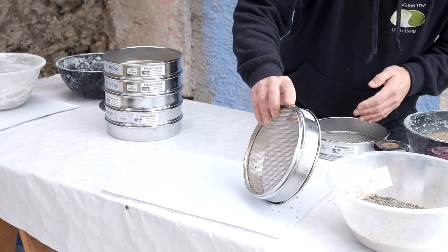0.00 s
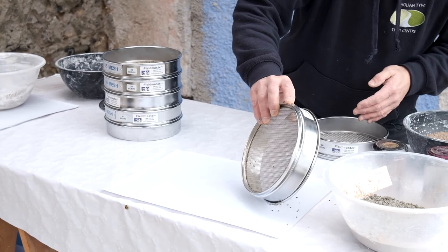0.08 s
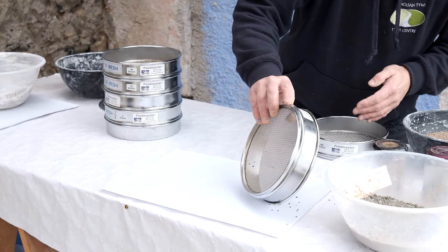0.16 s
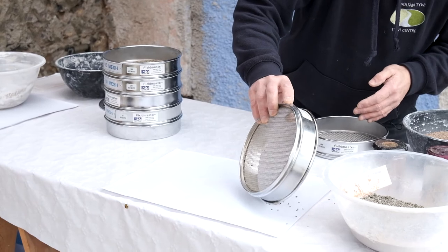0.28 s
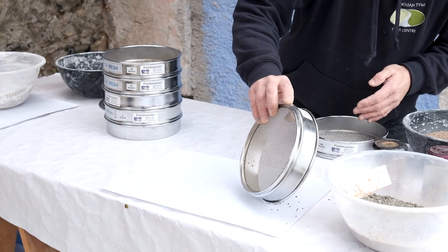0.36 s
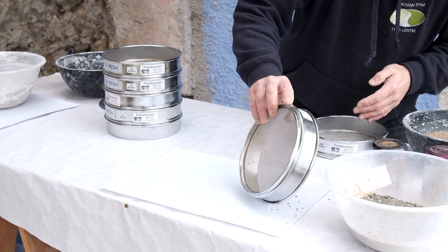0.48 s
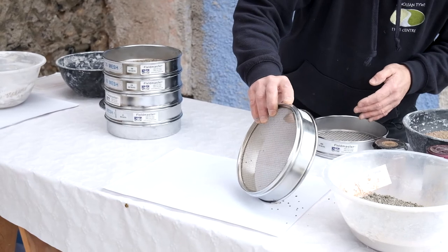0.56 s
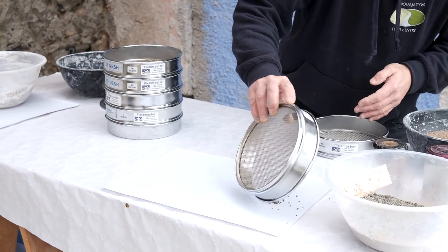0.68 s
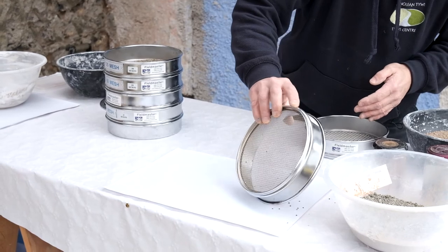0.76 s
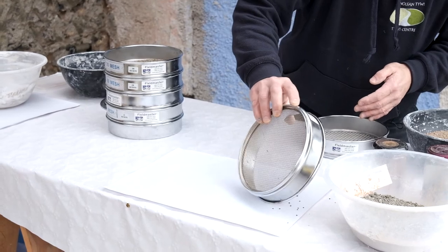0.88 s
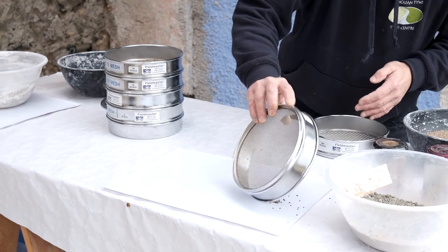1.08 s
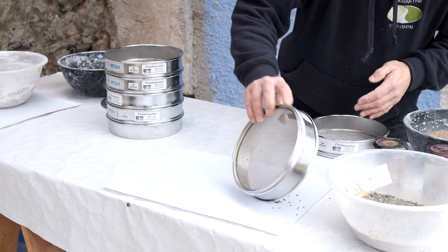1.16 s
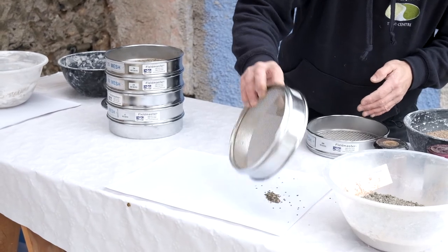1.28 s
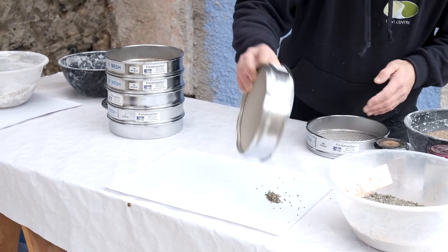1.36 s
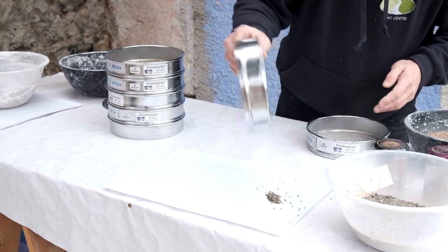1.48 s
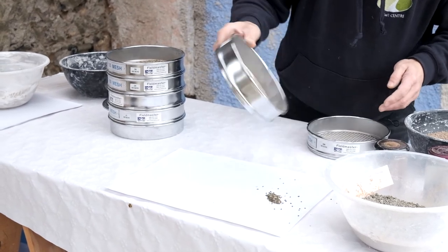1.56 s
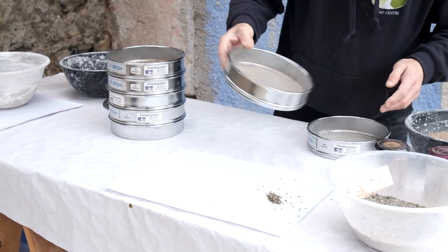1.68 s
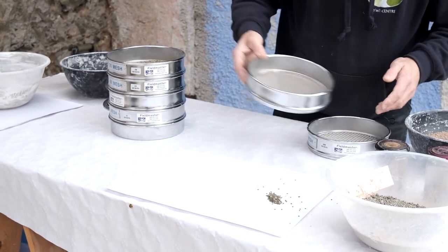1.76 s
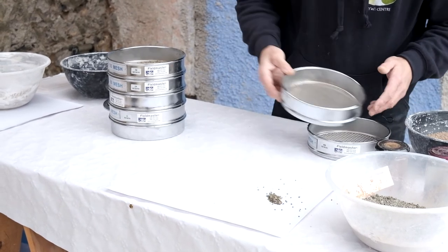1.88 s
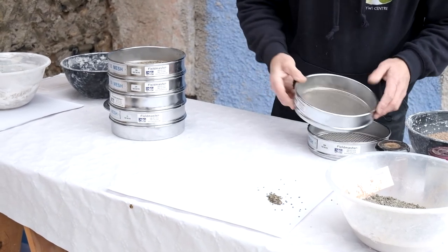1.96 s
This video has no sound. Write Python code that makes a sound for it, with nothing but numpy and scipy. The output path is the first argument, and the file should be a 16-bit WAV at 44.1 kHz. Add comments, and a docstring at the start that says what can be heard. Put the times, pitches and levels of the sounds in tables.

```python
"""Sieve knocked out on a table

A metal sieve is knocked on its rim against a cloth-covered table to shake out the last grit. The table top
thuds as a sum of damped modes over a dense shudder of noise; mesh and sand rattle as random impacts after
each knock, grains tick as band-limited bursts. Short blurred tones ring within the first knock, faintly later
and in a late scrape. Nearby walls answer by discrete echoes and a diffuse tail, over shaped noise for outdoor
rumble and gliding tones for faint birds."""
import sys
import numpy as np
from scipy import signal
from scipy.fft import rfft, irfft
from scipy.io import wavfile
from scipy.ndimage import uniform_filter1d

SR = 44100
rng = np.random.default_rng(int(sys.argv[2]) if len(sys.argv) > 2 else 0)


def attenuation_scalar(level_db):
    """Turn a level in dB into a linear amplitude multiplier (20 dB per decade)."""
    decades = np.asarray(level_db, float) / 20
    return 10 ** decades


def output_pcm(signal):
    """Save a mono or channel-first signal as 16-bit PCM at the path in sys.argv[1].

    Samples are clipped to [-1, 1] before scaling.
    """
    pcm = np.clip(np.atleast_2d(signal).T, -1, 1) * 32767
    wavfile.write(sys.argv[1], SR, np.round(pcm).astype(np.int16))


N = 88200  # samples, 2 s

# Blows of the rim on the table: (time [s], peak of the modal ring [dB], tuning of the modes [ratio],
# brightness [dB per octave], rattle level [dB], rattle t60 [s])
KNOCKS = [(0.0099, -19, 1.066, -2, -35, 0.12), (0.204, -11.5, 1.01, -4.5, -42, 0.13),
          (0.3803, -8, 0.97, -0.3, -43, 0.22), (0.5167, -8.5, 1.02, -4, -45, .2),
          (0.657, -6.5, 1.006, -0.6, -46.5, 0.3), (.7962, 3.5, 0.96, 6, -34.5, 0.2),
          (.9653, 0.38, .99, 3.5, -36.5, 0.21), (1.0815, -10, 1.03, -2.3, -49.5, 0.29),
          (1.1771, -2.5, 0.98, 4.5, -44.5, 0.27)]
# Spectrum of grit on the mesh: (frequency [Hz], density [dB per Hz])
MESH = [(1470, -20), (2500, -8.5), (3920, -7.5), (4480, 0.5), (5640, -4), (6710, -2), (7860, -10),
        (8910, -5.5), (11700, -8), (15700, -22.5), (16100, -34), (16500, -45.5)]
PIVOT_HZ = 300  # brightness tilts about this frequency


def evened(x):
    """Normalization: scales a signal to rms 1."""
    return x / np.sqrt(np.mean(x ** 2) + 1e-20)


def read(points, hz):
    """Interpolation on a log-frequency axis, since spectra vary by octaves."""
    f, value = np.transpose(points)
    return np.interp(np.log(hz + 1), np.log(f + 1), value)


def add(mix, s, sound):
    """Superposition: mixes a sound in at a time in seconds."""
    part = mix[round(s * SR):][:len(sound)]
    part += sound[:len(part)]


def coloured(x, points):
    """Linear filtering: multiplies the spectrum of x by a tabulated gain."""
    gain = attenuation_scalar(read(points, np.fft.rfftfreq(len(x), 1 / SR)))
    return irfft(rfft(x) * gain, len(x))


def slow_noise(blur_s):
    """Lowpass noise of rms 1: averaging twice removes the fast fluctuations."""
    width = round(blur_s * SR)
    noise = rng.standard_normal(N)
    return evened(uniform_filter1d(uniform_filter1d(noise, width), width))


def air():
    """Broadband ambience: shaped noise for distant traffic and air, its level swelling slightly."""
    # Outdoor rumble: (frequency [Hz], density [dB per Hz])
    spectrum = [(18, -34.5), (30, -5.5), (59, 4.5), (161, 0), (295, -8), (355, -6), (499, -8), (937, -2.5),
                (2540, -26), (3870, -28), (5740, -29), (11400, -44.5), (16000, -62)]
    # Its course before the wide-band gain and swell: (time [s], level [dB])
    course = [(0.0, -53), (0.52, -53.5), (1.05, -54), (1.3, -59), (1.61, -62.5), (2.0, -64)]
    wide_db, swell_db = 3.5, 0.61  # whole band over its middle; rms of the swell
    t = np.arange(N) / SR
    swell = evened(sum(np.sin(2 * np.pi * (f * t + rng.random())) / np.sqrt(f)
                       for f in np.geomspace(.5, 12, 20)))
    level_db = wide_db + np.interp(t, *np.transpose(course))
    return attenuation_scalar(level_db + swell_db * swell) * evened(coloured(rng.standard_normal(N), spectrum))


def crackle(per_s, spread_db):
    """Shot noise: dense random grain impacts of uneven size, coloured by the mesh."""
    hit, size, sign = rng.random((N, 3)).T
    heights = attenuation_scalar(-spread_db * np.log(size + 1e-3))
    impacts = (hit < per_s / SR) * heights * np.sign(sign - .5)
    return evened(coloured(impacts, MESH))


def rattle():
    """Exponentially damped shot noise: mesh and sand shiver after every knock, over a trickle."""
    # Fine sand trickling: (time [s], level [dB])
    trickle = [(0.0, -50.5), (0.07, -61), (0.2, -52), (0.38, -78), (0.48, -83), (1.06, -62.5), (1.12, -67),
               (1.27, -77), (1.7, -80), (2.0, -73)]
    rise_s = 0.002
    t = np.arange(SR // 2) / SR
    envelope = np.zeros(N)
    for s, _, _, _, db, t60 in KNOCKS:
        add(envelope, s, attenuation_scalar(db - 60 * t / t60) * np.minimum(t / rise_s, 1))
    s, db = np.transpose(trickle)
    fine = attenuation_scalar(np.interp(np.arange(N) / SR, s, db))
    return envelope * crackle(per_s=9000, spread_db=0.5) + fine * crackle(per_s=4000, spread_db=3.5)


def landings(rows):
    """Transient excitation: each landing is a dying noise burst around its own pitch."""
    low_hz, top_hz = 3600, 14400
    width = 0.25  # standard deviation of the band in natural log of frequency
    gain_db, lag_s, rise_s = -1, .0006, .0003
    out, size = np.zeros(N), 8192
    t, f = np.arange(size) / SR, np.fft.rfftfreq(size, 1 / SR)
    limits = 1 / (1 + (low_hz / (f + 1)) ** 4) / (1 + (f / top_hz) ** 8)
    for s, db, hz, t60 in rows:
        noise = rng.standard_normal(size)
        bell = np.exp(-.5 * (np.log(f / hz + 1e-9) / width) ** 2)
        band = irfft(rfft(noise) * bell, size)
        both = evened(band) + evened(coloured(noise, MESH))
        tick = irfft(limits * rfft(both), size)
        tick = tick * attenuation_scalar(-60 * t / t60) * np.minimum(t / rise_s, 1)
        add(out, s + lag_s, attenuation_scalar(gain_db + db) * tick / abs(tick).max())
    return out


def table_ring(peak_db, tuning, bright_db):
    """Modal superposition: a short push through the cloth rings damped modes; blows differ in brightness."""
    # Modes of table top and rim, t60 capped below in cycles:
    # (frequency [Hz], relative level [dB], t60 [s], signed weight by direction of first swing [ratio])
    modes = [(96, -20, 0.055, 0.87), (157.7, -19, .4, -1.12), (196, -24, .3, 0.78),
             (232.6, -0.5, 0.049, 0.91), (313.1, 2, 0.051, -0.99), (392, -8.5, 0.098, -0.28),
             (554.6, -8.5, 0.053, -1.337), (632, -30, 0.14, 0.31), (889.6, -15.5, 0.038, -0.87),
             (1120, -37.5, .025, 0.33), (1640, -30.5, 0.01546, -1.06), (1970, -32.5, 0.01535, 0.37),
             (2370, -49, .01, -0.62), (2800, -44, .01, 0.98), (3500, -49, .008, -1),
             (4690, -43.5, .025, 0.95), (4970, -42, .025, -0.74), (6000, -45.5, .008, 1)]
    contact_s, longest_cycles = 0.0021, 45
    scatter = 0.008  # random detuning of each mode, as a ratio
    t = np.arange(SR // 2) / SR
    ring = np.zeros(len(t))
    for hz, db, t60, weight in modes:
        tilt_db = bright_db * np.log2(hz / PIVOT_HZ)
        decay_db = 60 * t / min(t60, longest_cycles / hz)
        tuned_hz = hz * tuning * (1 + scatter * rng.standard_normal())
        ring += weight * attenuation_scalar(db + tilt_db - decay_db) * np.sin(2 * np.pi * tuned_hz * t)
    ring = ring * np.sin(np.pi / 2 * np.minimum(t / contact_s, 1))
    return attenuation_scalar(peak_db) * ring / abs(ring).max()


def shudder(peak_db, bright_db):
    """High modal density: trestle, bowls and sieves on the table shake as noise decaying band by band."""
    # Dense shudder before the tilt: (frequency [Hz], density [dB per Hz])
    spectrum = [(24, -45.5), (40, -23), (91, -1), (128, -2.5), (160, 6.5), (331, -2), (482, -3),
                (559, -8.5), (769, -17), (860, -12), (1510, -27), (3130, -41), (3500, -42.5), (4550, -59.5),
                (7700, -120)]
    # Its decay: (frequency [Hz], t60 [s])
    decay = [(60, 0.26), (160, 0.29), (300, 0.31), (700, 0.32), (1800, 0.2)]
    gain_db, rise_s = -21, 0.0046
    bright_share = 0.468  # of the knock's brightness
    noise = rng.standard_normal(SR // 2)
    t = np.arange(len(noise)) / SR
    hz, at, z = signal.stft(noise, SR, nperseg=1024)
    tilt_db = bright_share * bright_db * np.log2((hz + 20) / PIVOT_HZ)
    decay_db = 60 * at / read(decay, hz)[:, None]
    z = z * attenuation_scalar((read(spectrum, hz) + tilt_db)[:, None] - decay_db)
    shaking = signal.istft(z, SR, nperseg=1024)[1][:len(t)]
    early_rms = np.sqrt(np.mean(shaking[:SR // 20] ** 2))
    return attenuation_scalar(peak_db + gain_db) * shaking / early_rms * np.minimum(t / rise_s, 1) ** 2


def blurred_tones():
    """Amplitude modulation: slow noise blurs short, exponentially decaying tones."""
    # Ringing within the first knock, faint later tones, a late scrape:
    # (time [s], level before rise and blur [dB], frequency [Hz], t60 [s])
    short_tones = [(.0115, -46, 1600, .15), (.012, -30, 4600, .04), (.0125, -31, 4950, .04),
                   (.93, -56, 3600, .06), (1.375, -47, 540, .14), (1.978, -62, 2250, .15),
                   (1.9785, -66, 3400, .1)]
    rise_s = 0.0014
    out, t = np.zeros(N), np.arange(SR // 4) / SR
    for s, db, hz, t60 in short_tones:
        tone = np.sin(2 * np.pi * hz * t)
        add(out, s, attenuation_scalar(db - 60 * t / t60) * np.minimum(t / rise_s, 1) * tone)
    return out * (.8 + .6 * slow_noise(0.0017))


def walls(x):
    """Diffuse reverberation: convolution with sparse random taps dying band by band."""
    # Reverberation between the walls: (frequency [Hz], t60 [s])
    decay = [(100, 0.77), (260, 0.18), (700, 0.34), (1800, 0.48), (5000, 0.71), (14000, 0.6)]
    gap_s, spacing = 0.017, 20  # silence before the tail; samples per tap
    taps, count = np.zeros(SR), SR // spacing - 1
    places = np.arange(0, SR - spacing, spacing) + rng.integers(0, spacing, count)
    taps[places] = rng.choice([-1., 1.], count)
    hz, t, z = signal.stft(taps, SR, nperseg=512)
    z = z * attenuation_scalar(-60 * t / read(decay, hz)[:, None])
    tail = signal.istft(z, SR, nperseg=512)[1]
    tail = tail * (np.arange(len(tail)) > gap_s * SR)
    return signal.fftconvolve(x, tail / np.linalg.norm(tail))[:N]


def echoes(x):
    """Specular reflection: single delayed slaps from the nearest walls."""
    # Reflections: (delay [s], gain [ratio])
    slaps = [(0.009, -0.00072), (0.023, .09), (.034, 0.24), (0.054, 0.16)]
    out = np.zeros(N)
    for s, gain in slaps:
        add(out, s, gain * x[:N - round(s * SR)])
    return out


def birds():
    """Frequency glides: thin whistles far off, broken up in amplitude by the air."""
    # Notes: (start [s], length [s], start frequency [Hz], end frequency [Hz],
    # level before gain and break-up [dB])
    notes = [(1.325, .075, 8300, 7800, -72), (1.4, .04, 8000, 7300, -70), (1.42, .1, 8500, 8300, -80),
             (1.47, .03, 6200, 6100, -78), (1.565, .03, 5600, 5900, -80), (1.64, .055, 5500, 5700, -77),
             (1.69, .11, 8350, 8300, -82), (1.755, .035, 5500, 5400, -78), (1.793, .02, 4600, 5800, -78)]
    gain_db = 2
    out = np.zeros(N)
    for s, length, from_hz, to_hz, db in notes:
        u = np.arange(0, 1, 1 / (length * SR))
        phase = 2 * np.pi * np.cumsum(from_hz + (to_hz - from_hz) * u) / SR
        add(out, s, attenuation_scalar(db) * np.sqrt(np.sin(np.pi * u)) * np.sin(phase))
    return attenuation_scalar(gain_db) * out * (.9 + .35 * slow_noise(0.0055))


def scene():
    """Superposition of table, mesh, grains and their reflections over the outdoor floor."""
    # Single grains landing, 1 dB softer and slightly later when played:
    # (time [s], peak level [dB], centre frequency [Hz], t60 [s])
    single_grains = [(0.0564, -20, 6200, 0.015), (0.0693, -28, 6590, 0.016), (0.0753, -31, 11300, 0.014),
                     (0.0804, -22, 10100, 0.0093), (0.087, -24.5, 5420, 0.0086), (0.107, -34, 6830, 0.011),
                     (0.127, -34, 4850, 0.0055), (0.1324, -37, 10900, 0.0098), (0.1417, -30.5, 6250, 0.009),
                     (0.159, -28, 6850, 0.0051), (0.18, -36, 6280, 0.0088), (0.185, -33, 6220, 0.0038),
                     (0.2123, -19.5, 5840, 0.0094), (0.2757, -45, 7070, 0.008),
                     (0.3174, -33.5, 4960, 0.0066), (0.4058, -31, 6250, 0.0068),
                     (0.4275, -39.5, 9220, 0.01), (0.4474, -44, 5240, 0.008), (0.6214, -56, 10500, 0.0094),
                     (0.6993, -22, 6310, 0.012), (0.7431, -39.5, 6560, 0.0065),
                     (0.7676, -37.5, 5050, 0.0072), (0.9469, -33, 4890, 0.0058),
                     (1.0129, -22.5, 6720, 0.012), (1.06, -32.5, 8610, 0.0041), (1.083, -32, 6890, 0.0062),
                     (1.123, -41, 6800, 0.007), (1.223, -25, 6020, 0.0066), (1.2656, -33.5, 9630, 0.0059),
                     (1.292, -40.5, 6240, 0.008), (1.3091, -45, 7670, 0.0065), (1.3494, -53, 8040, 0.008),
                     (1.379, -58.5, 7960, 0.0036), (1.523, -36.5, 6600, 0.0059), (1.591, -50, 7050, 0.007),
                     (1.858, -41.5, 10400, 0.008), (1.8667, -47.5, 6290, 0.0089), (1.943, -52, 8770, 0.008),
                     (1.955, -52.5, 7010, 0.009)]
    # Handfuls of grit landing or sliding together, played likewise:
    # (time [s], peak level [dB], centre frequency [Hz], t60 [s])
    sprays = [(.0005, -36.5, 9600, 0.26), (.1165, -34.5, 11000, .04), (.3651, -29.5, 10900, 0.098),
              (.3755, -34, 9050, .06), (.512, -51.5, 8040, .06), (.5578, -25, 11200, 0.085),
              (.6494, -39, 9000, .04), (.7925, -46, 6000, .04), (.961, -42.5, 9020, 0.047),
              (1.4516, -52, 4190, 0.066), (1.527, -51.5, 4800, 0.24), (1.862, -54, 7000, .15),
              (1.978, -49, 8800, .15)]
    slap_top_hz, walls_table_db, walls_bright_db = 2500, -17, -18.5
    table, shudders = np.zeros((2, N))
    for s, peak_db, tuning, bright_db, _, _ in KNOCKS:
        add(table, s, table_ring(peak_db, tuning, bright_db))
        add(shudders, s, shudder(peak_db, bright_db))
    bright = rattle() + landings(single_grains) + landings(sprays) + blurred_tones()
    dull = signal.sosfilt(signal.butter(2, slap_top_hz, fs=SR, output="sos"), table)
    wet = walls(attenuation_scalar(walls_table_db) * dull + attenuation_scalar(walls_bright_db) * bright) + echoes(dull)
    return (table + shudders + bright + wet + birds() + air())[None]


def top_cut(x):
    """Nothing passes above the cut-off."""
    return signal.sosfilt(signal.butter(12, 16960, fs=SR, output="sos"), x)


def record(dry):
    """Transducer limits: the microphone drops the deepest bass and the hardest knocks clip."""
    low_hz, ceiling = 43.4, 1.0
    low_cut = signal.sosfilt(signal.butter(1, low_hz, "high", fs=SR, output="sos"), dry)
    return top_cut(np.clip(low_cut, -ceiling, ceiling))


dry = scene()
out = record(dry)
output_pcm(out)
```